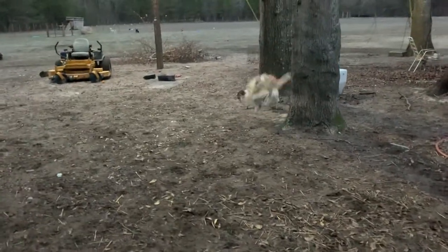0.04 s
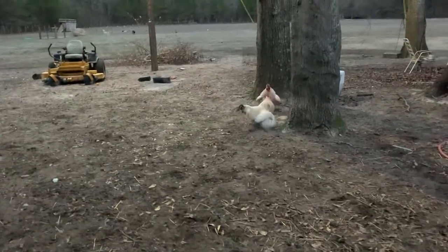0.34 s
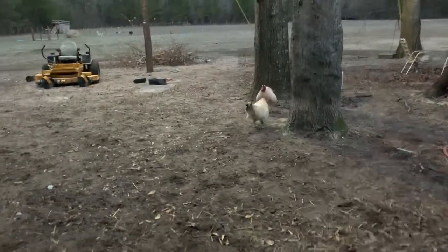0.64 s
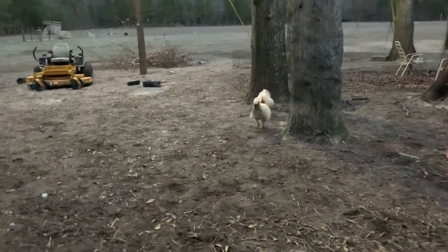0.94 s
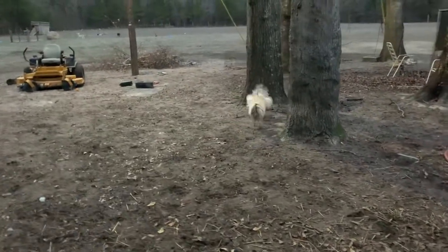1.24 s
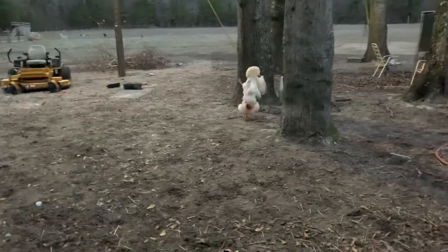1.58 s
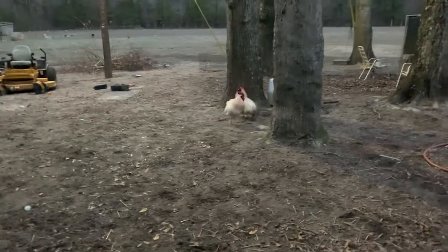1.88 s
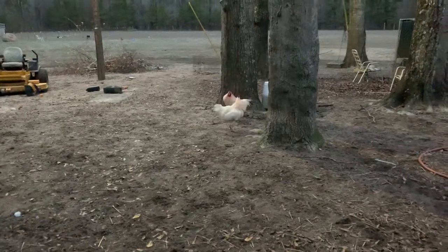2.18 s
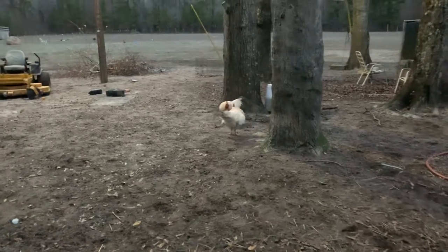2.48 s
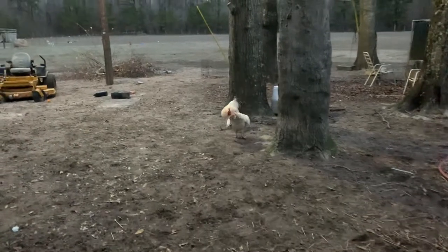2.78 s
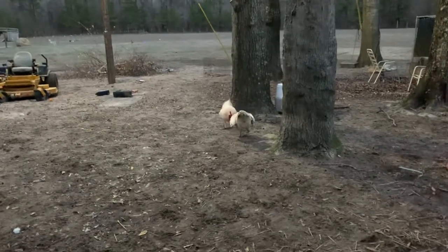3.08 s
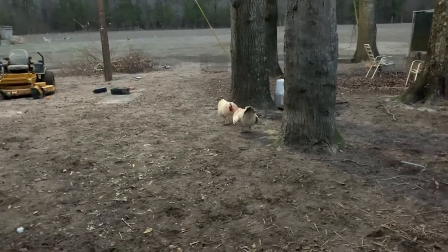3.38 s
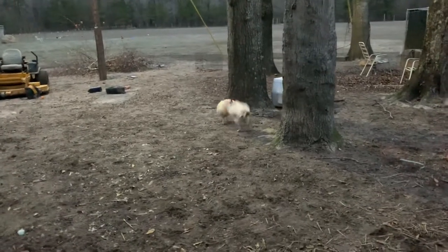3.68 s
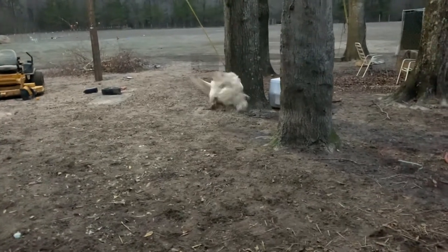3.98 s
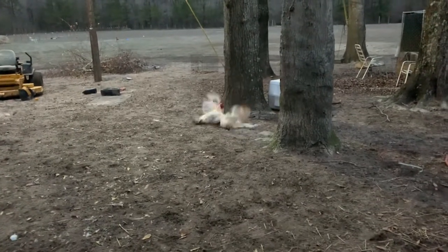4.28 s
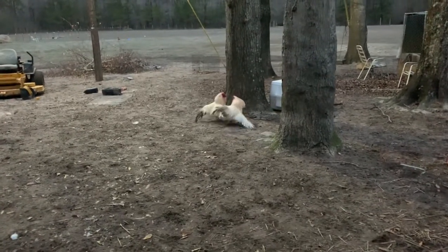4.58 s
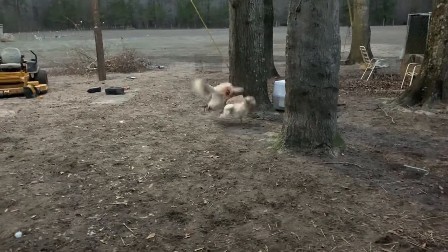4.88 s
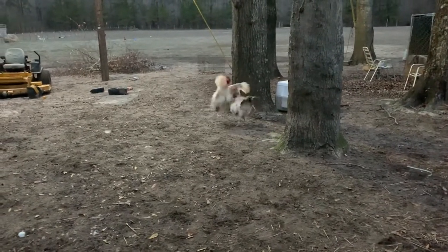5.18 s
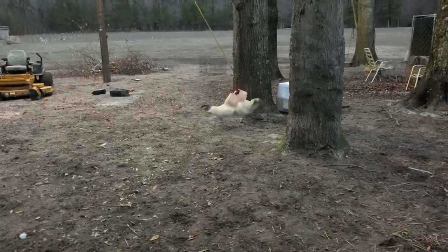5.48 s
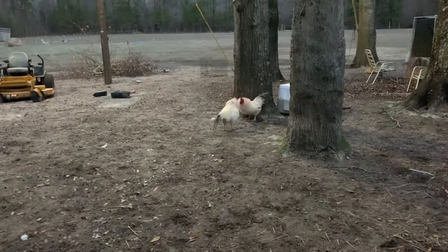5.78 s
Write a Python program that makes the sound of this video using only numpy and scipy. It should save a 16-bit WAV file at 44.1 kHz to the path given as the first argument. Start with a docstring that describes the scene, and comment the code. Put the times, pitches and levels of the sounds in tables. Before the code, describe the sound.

Two roosters fight in dry leaves, their wings slapping and thumping in short bursts over a low outdoor rumble.

```python
"""Two roosters fight in dry leaves by a tree, metres from a small hand-held two-port microphone.
Over a low outdoor rumble they clash at once and again at 1.4 s: each wing beat is a slap of stiff
feathers and a hollow thump of air; feet scuff, litter crackles, trunks and ground scatter the sound.
The grip rubs softly in the lulls. A faint whistle at 3.55 s precedes the main clash at 3.9-4.5 s;
lighter scuffling and a few weaker beats follow."""
import sys
import numpy as np
from scipy import signal
from scipy.fft import rfft, irfft, next_fast_len
from scipy.io import wavfile

SR = 44100
rng = np.random.default_rng(int(sys.argv[2]) if len(sys.argv) > 2 else 0)


def generate_wav(signal):
    """Clip the signal to [-1, 1] and save it as 16-bit WAV at the path in sys.argv[1]."""
    frames = np.transpose(np.atleast_2d(signal))
    scaled = np.clip(frames, -1, 1) * 32767
    pcm = np.round(scaled).astype(np.int16)
    wavfile.write(sys.argv[1], SR, pcm)


N = 261954
TIME_S = np.arange(N) / SR
FFT_SIZE = next_fast_len(N + SR // 3, real=True)
FREQS_HZ = np.maximum(np.arange(FFT_SIZE // 2 + 1) * SR / FFT_SIZE, 1)


def from_db(db):
    """Decibels to gain."""
    return 10 ** (np.asarray(db) / 20)


def unit_rms(x):
    """Scale to unit power."""
    return x / np.sqrt(np.mean(x ** 2) + 1e-20)


def over_hz(points):
    """Interpolate (freq_hz, value) rows along log frequency."""
    hz, value = np.transpose(points)
    return np.interp(np.log(FREQS_HZ), np.log(hz), value)


def through(x, response):
    """Apply a frequency response."""
    return irfft(rfft(x, FFT_SIZE) * response, FFT_SIZE)[..., :N]


def colour(x, points):
    """Minimum-phase filter from (freq_hz, gain_db) rows."""
    cepstrum = irfft(np.log(from_db(over_hz(points))), FFT_SIZE)
    cepstrum[1:FFT_SIZE // 2] *= 2
    cepstrum[FFT_SIZE // 2 + 1:] = 0
    return through(x, np.exp(rfft(cepstrum)))


def band(x, low_hz, high_hz):
    """Gentle band-pass."""
    edges_hz = [low_hz, min(high_hz, SR / 2 - 1000)]
    return signal.sosfilt(signal.butter(2, edges_hz, "band", fs=SR, output="sos"), x)


def drift(knots_per_s):
    """Random wander, unit power."""
    knots = rng.standard_normal(N // 20)
    return unit_rms(np.interp(TIME_S * knots_per_s, np.arange(len(knots)), knots))


def grains(per_s, spread_db, size=N):
    """Random clicks of uneven size, unit power."""
    onsets = np.flatnonzero(rng.random(size) < per_s / SR)
    clicks = np.zeros(size)
    strength, sign = rng.random((2, size))[:, onsets]
    clicks[onsets] = from_db(spread_db * np.minimum(-np.log(strength), 4)) * np.sign(sign - .5)
    return unit_rms(clicks) + 1e-18


def add(out, start_s, sound):
    """Mix a sound in at start_s."""
    start = max(int(start_s * SR), 0)
    out[start:start + len(sound)] += sound[:N - start]


def stroke(centre_hz, half_width_ratio, rise_s, decay_s):
    """Grainy noise band that swells and fades."""
    t = TIME_S[:SR // 2]
    clicks = grains(per_s=2000, spread_db=1.5, size=len(t))
    rub = unit_rms(band(clicks, centre_hz / half_width_ratio, centre_hz * half_width_ratio))
    envelope = (1 - np.exp(-t / rise_s)) * np.exp(-t / decay_s)
    return rub * envelope / envelope.max()


def outdoors(rumble_db=-49.5, hiss_db=-78.5):
    """Low rumble, nearly equal on both sides, and a faint wide hiss."""
    rumble_colour = [(12, -47), (20, -9.5), (49, -2.5), (102, -1), (121, -3), (136, -11.5), (176, -10.5),
                     (213, -18), (290, -23.5), (315, -22.5), (415, -29.5), (546, -36), (1200, -61.5),
                     (1700, -115)]  # freq_hz, gain_db
    side_colour = [(60, -23), (130, -16.5), (250, -12.5), (500, -14.5)]  # left-right difference: freq_hz, gain_db
    hiss_colour = [(200, -5.5), (500, 19.5), (1000, 6), (2000, 7.5), (4000, -3), (8000, -1.5), (15000, -49)]  # freq_hz, gain_db
    mid, side = unit_rms(colour(rng.standard_normal((2, N)), rumble_colour))
    rumble = mid + colour(side, side_colour) * [[1], [-1]]
    hiss = unit_rms(colour(rng.standard_normal((2, N)), hiss_colour))
    return from_db(rumble_db) * rumble + from_db(hiss_db) * hiss


def whistle(start_s=3.55, level_db=-84):
    """Faint thin whistle just before the main clash."""
    out = np.zeros(N)
    tone = stroke(centre_hz=2120, half_width_ratio=1.15, rise_s=0.09, decay_s=0.09)
    add(out, start_s, from_db(level_db) * tone)
    return out


def grip(centre_hz=920, half_width_ratio=1.71, pan_db=3):
    """The hand shifts on the microphone: soft rubs, leaning right."""
    rubs = [(0.476, -66, 0.11), (0.594, -73, 0.032), (1.218, -54.5, 0.04), (1.245, -66, 0.058),
            (2.307, -73, 0.043), (3.183, -67, 0.1), (3.25, -64, 0.042)]  # start_s, level_db, length_s
    out = np.zeros(N)
    for start_s, level_db, length_s in rubs:
        rub = stroke(centre_hz, half_width_ratio, rise_s=0.41 * length_s, decay_s=0.6 * length_s)
        add(out, start_s, from_db(level_db) * rub)
    return out * from_db([[-pan_db], [pan_db]])


def yard(x, near_s=0.0075, far_s=0.084, far_db=-15, shifts_per_s=6, paths=3):
    """Ground and trunks scatter sound to each side; echo paths crossfade as the birds move."""
    scatter_colour = [(100, -22), (300, -17.5), (600, -10), (1100, -6), (2000, -1.5), (4000, -4), (6200, 3),
                      (7400, -11.5), (8300, -0.5), (9800, 2.5), (11400, -43), (12700, 5), (15000, -7)]  # freq_hz, gain_db
    t = TIME_S[:SR // 3]
    decay = np.exp(-t / near_s) + from_db(far_db) * np.exp(-t / far_s)
    echoes = rng.standard_normal((paths, 2, len(t))) * decay
    echoes /= np.sqrt(np.sum(echoes ** 2, axis=-1, keepdims=True))
    fade_rad = np.pi * (shifts_per_s * TIME_S + np.arange(paths)[:, None]) / paths
    shares = np.cos(fade_rad) ** 2
    shares /= np.sqrt(np.sum(shares ** 2, axis=0))
    sent = rfft(colour(x, scatter_colour) * shares, FFT_SIZE)
    returned = np.sum(sent[:, None] * rfft(echoes, FFT_SIZE), axis=0)
    return irfft(returned, FFT_SIZE)[:, :N]


def leaf_litter(patchy_db=1.5, clump_db=3.2, break_db=-7):
    """Each leaf size crackles in clumps in its own band; single leaves break."""
    leaf_colour = [(500, 1.5), (1200, -2), (2300, 2), (4000, 7.5), (6000, -2), (9000, 3.5), (13000, -0.5),
                   (16000, -1.5)]  # freq_hz, gain_db
    edges_hz = np.geomspace(600, 16000, 10)
    rustle = np.zeros(N)
    for low_hz, high_hz in zip(edges_hz, edges_hz[1:]):
        pressure = from_db(patchy_db * drift(knots_per_s=8.4) + clump_db * drift(knots_per_s=110))
        rustle += pressure * band(grains(per_s=1100, spread_db=2.5), low_hz, high_hz)
    breaks = from_db(break_db) * grains(per_s=290, spread_db=4.5)
    return unit_rms(colour(unit_rms(rustle) + breaks, leaf_colour))


def bout_gain(start_s, end_s, peak_db, sag_db_per_s, flare_db_per_s=380, stop_db_per_s=260):
    """Flares up to start_s, sags until end_s, breaks off."""
    early_s, since_s, late_s = np.maximum([start_s - TIME_S, TIME_S - start_s, TIME_S - end_s], 0)
    return from_db(peak_db - flare_db_per_s * early_s - sag_db_per_s * since_s - stop_db_per_s * late_s)


def scuffle(leaf_trim_db=-2, swish_trim_db=-3, flutter_db=1.5):
    """Leaves rustle underfoot and plumage brushes, in uneven bouts."""
    bouts = [(0.01, 0.205, -61.5, -48), (0.236, 0.442, -61.5, -53), (1.404, 1.548, -58.5, -47.5),
             (1.682, 1.952, -67, -51.5), (3.733, 3.8, -71.5, -74), (3.841, 3.87, -60, -59),
             (3.892, 4.085, -52, -36.5), (4.108, 4.252, -59.5, -37.5), (4.291, 4.476, -56.5, -42.5),
             (4.527, 4.677, -64.5, -56), (4.729, 4.9, -69.5, -60.5), (4.922, 5.215, -65, -54),
             (5.242, 5.475, -66.5, -55.5), (5.786, 5.913, -71, -60)]  # start_s, end_s, leaf_db, swish_db
    swish_colour = [(35, 8.5), (90, 13), (160, 10), (280, 3.5), (600, -3), (1000, -14.5), (1600, -14.5),
                    (3000, -23.5)]  # freq_hz, gain_db
    leaf_gain, swish_gain = from_db(-82.5), from_db(-75)  # shuffling between bouts
    for start_s, end_s, leaf_db, swish_db in bouts:
        leaf_gain = np.maximum(leaf_gain, bout_gain(start_s, end_s, leaf_db, sag_db_per_s=39.5))
        swish_gain = np.maximum(swish_gain, bout_gain(start_s, end_s, swish_db, sag_db_per_s=40))
    leaves = from_db(leaf_trim_db) * leaf_litter()
    swish = from_db(swish_trim_db) * unit_rms(colour(rng.standard_normal(N), swish_colour))
    flutter = from_db(flutter_db * drift(knots_per_s=43))
    return flutter * (leaf_gain * leaves + swish_gain * swish)


def foot_scuffs(catch_db=1.5):
    """Feet drag through the litter, catching as they go."""
    drags = [(0.26, -58, 3480, 0.047, 2.8), (0.505, -65.5, 9100, 0.036, 1.8), (0.858, -66, 920, 0.064, 2.4),
             (0.862, -62.5, 6000, 0.062, 2.05), (0.893, -62.5, 700, 0.041, 4.1),
             (1.562, -59, 9000, 0.016, 2.6), (1.822, -58, 11000, 0.012, 1.2),
             (1.853, -62, 8000, 0.015, 2.1), (2.408, -74, 5500, 0.019, 1.8),
             (2.755, -66.5, 1700, 0.065, 4.4), (2.786, -67.5, 3600, 0.077, 4.1),
             (2.856, -68, 1090, 0.038, 2.6), (2.973, -55, 11000, 0.036, 1.9),
             (2.974, -70.5, 2470, 0.064, 1.2), (2.972, -68, 4140, 0.059, 1.07),
             (3.002, -59.5, 7600, 0.032, 4.7), (3.463, -68, 8300, 0.049, 6.2),
             (3.495, -67.5, 7500, 0.032, 1.1), (3.498, -71.5, 3330, 0.047, 1.4),
             (4.29, -39, 4600, 0.044, 6.1), (4.315, -50.5, 1960, 0.013, 1.06),
             (4.425, -53, 3000, 0.012, 3.8), (4.6, -65.5, 3370, 0.046, 2.2),
             (4.732, -73, 12000, 0.022, 1.5), (4.954, -64, 6000, 0.023, 2.1), (5.305, -59, 4800, 0.025, 3),
             (5.346, -54.5, 5470, 0.041, 3.3)]  # start_s, level_db, centre_hz, length_s, half_width_ratio
    drag_colour = [(800, 7.5), (1600, -2.5), (2600, 0), (3500, -0.5), (4400, -0.5), (5400, -7.5),
                   (8300, -5.5), (13000, -10)]  # freq_hz, gain_db
    out = np.zeros(N)
    for start_s, level_db, centre_hz, length_s, half_width_ratio in drags:
        drag = stroke(centre_hz, half_width_ratio, rise_s=0.35 * length_s, decay_s=0.74 * length_s)
        add(out, start_s, from_db(level_db) * drag)
    return colour(out, drag_colour) * from_db(catch_db * drift(knots_per_s=320))


def snaps(ring_db=-2, decay_cycles=3.5, half_width_ratio=1.7):
    """Pecks and snapping twigs: a hard crack that rings a few cycles."""
    contacts = [(0.18, -60, 1060), (0.243, -46.5, 3600), (0.498, -63, 960), (0.787, -66, 2180),
                (1.417, -58, 1900), (1.449, -42, 1900), (1.52, -57, 2540), (1.668, -51, 2500),
                (1.74, -54, 1130), (1.856, -57, 800), (1.884, -63, 4500), (1.892, -57.5, 3900),
                (2.667, -68.5, 1950), (2.974, -56, 8500), (3.872, -35, 995), (4.005, -61, 2040),
                (4.05, -48, 1840), (4.162, -38.5, 1190), (4.263, -45.5, 1870), (4.648, -60, 3480),
                (4.664, -59, 3380), (5.012, -62, 1080), (5.09, -62, 2900), (5.159, -68.5, 8800)]  # start_s, level_db, centre_hz
    out, t = np.zeros(N), TIME_S[:SR // 30]
    for start_s, level_db, centre_hz in contacts:
        fade = np.exp(-t * centre_hz / decay_cycles)
        burst = rng.standard_normal(len(t)) * fade
        crack = unit_rms(band(burst, centre_hz / half_width_ratio, centre_hz * half_width_ratio))
        crack += from_db(ring_db) * unit_rms(np.sin(2 * np.pi * centre_hz * t) * fade)
        add(out, start_s, from_db(level_db) * crack / np.std(crack[:SR // 200]))  # level of first 5 ms
    return out


def wing_thumps(sag_per_cycle=0.089, eddy_db=-17, eddy_low_hz=250, eddy_high_hz=750):
    """A wing shoves air or hits a body: a few hollow cycles that slow and shed eddies."""
    shoves = [(0.069, -34, 180.5, 2.8), (0.068, -46, 485, 1.3), (0.084, -34, 98, 0.33),
              (0.104, -36.5, 230, 1.23), (0.247, -35.5, 188, 0.65), (0.345, -36, 164, 0.54),
              (1.433, -39, 215, 1.14), (1.449, -26.5, 641, 1.28), (1.474, -41, 640, 1.6),
              (1.67, -48.5, 602, 1.8), (1.835, -43.5, 203, 1.6), (3.874, -31.5, 103, 0.52),
              (3.883, -32.5, 580, 1.6), (3.919, -23.5, 243, 1.2), (3.981, -27, 234, 1.1),
              (3.983, -28, 507, 1.2), (4.002, -33, 187, 1.7), (4.052, -33, 377, 1.1), (4.117, -38, 89, 1.4),
              (4.121, -38, 283, 0.46), (4.135, -29.5, 537, 1.45), (4.16, -35.5, 140, 1.7),
              (4.213, -35, 252, 0.93), (4.225, -30, 484, 0.82), (4.264, -30, 496, 0.65),
              (4.309, -35.5, 470, 0.87), (4.343, -29.5, 105, 1.03), (4.347, -26, 202, 0.53),
              (4.351, -26.5, 480, 0.83), (5.773, -30.5, 166, 0.51)]  # start_s, level_db, pitch_hz, swell_cycles
    out = np.zeros(N)
    for start_s, level_db, pitch_hz, swell_cycles in shoves:
        cycles = TIME_S[:SR // 6] * pitch_hz
        envelope = (cycles / swell_cycles * np.exp(1 - cycles / swell_cycles)) ** 2
        wave = np.sin(2 * np.pi * np.log1p(sag_per_cycle * cycles) / sag_per_cycle)
        eddies = unit_rms(band(rng.standard_normal(len(cycles)), eddy_low_hz, eddy_high_hz))
        eddies *= min(pitch_hz / eddy_low_hz, 1) ** 2  # slow strokes shed less
        add(out, start_s, from_db(level_db) * envelope * (wave + from_db(eddy_db) * eddies))
    return out


def feather_strike(t, treble_db, decay_s, rise_s=0.00012, split_hz=3500, lift_db=3):
    """The wing sweeps in, quills crack down at t = 0, vanes catch and rub on."""
    before_s, after_s = np.minimum(t, 0), np.maximum(t, 0)
    sweep = from_db(-24) * np.exp(before_s / 0.0072)
    tail = from_db(-26) * np.exp(-after_s / 0.034)
    catches = grains(per_s=7000, spread_db=2.5, size=len(t))
    dull = signal.sosfilt(signal.butter(1, split_hz, fs=SR, output="sos"), catches)
    burst = unit_rms(dull + from_db(treble_db + lift_db) * (catches - dull))
    contact = (1 - np.exp(-after_s / rise_s)) * np.exp(-after_s / decay_s)
    contact /= contact.max() * np.sqrt(np.average(burst ** 2, weights=contact ** 2))
    strike = burst * (contact + np.where(t < 0, sweep, tail))
    crack = np.sqrt(0.00016 * SR)  # energy of 0.16 ms at unit power
    strike[np.searchsorted(t, 0)] += crack * min(from_db(treble_db), 1)
    return strike


def wing_slaps(trim_db=-5, lead_s=0.05, body_hz=200, thinning_exponent=0.18):
    """Stiff feathers slap; a light touch uses only the tips and has little body."""
    beats = [(0.0675, -19, 12, 0.0006), (0.074, -37, 3, 0.005), (0.103, -54, -14, 0.0018),
             (0.243, -33, -11, .0006), (0.269, -42.5, -17, 0.0023), (0.345, -44, 6, 0.0022),
             (1.433, -35, 2, 0.0067), (1.448, -20.5, -2, 0.0014), (1.453, -33, -5, 0.0032),
             (1.6685, -27.5, 6, 0.0007), (1.674, -36, 1, 0.006), (3.870, -13, 7, 0.002),
             (3.877, -24, -1, 0.004), (3.883, -23, -2, 0.0028), (3.919, -37, -25, 0.0034),
             (3.978, -33, -7, 0.008), (3.99, -25, 12, 0.0017), (4.001, -26, -7, 0.003),
             (4.048, -35, -31, 0.0032), (4.133, -23.5, 0, 0.0016), (4.145, -24, -4, 0.0019),
             (4.159, -21.5, 0, 0.002), (4.198, -33, -14, 0.0017), (4.206, -31, -7, 0.003),
             (4.338, -26, -6, 0.0018), (4.343, -23, -4, 0.003), (4.971, -39, 1, .003),
             (5.259, -33.5, 3, 0.0018), (5.405, -39, 0, 0.0043), (5.767, -43.5, -4.5, 0.003)]  # contact_s, level_db, treble_db, decay_s
    slap_colour = [(150, -5), (450, 13), (700, 1.5), (1100, 2), (1500, -1.5), (2100, -1.5), (3500, -3),
                   (6000, -8), (10000, -8), (14000, -9), (16000, -32)]  # freq_hz, gain_db
    out, t = np.zeros(N), TIME_S[:SR // 3] - lead_s
    hardest_db = max(beat[1] for beat in beats)
    for contact_s, level_db, treble_db, decay_s in beats:
        strike = feather_strike(t, treble_db, decay_s)
        low_cut_hz = body_hz / from_db(level_db - hardest_db) ** thinning_exponent
        slap = signal.sosfilt(signal.butter(1, low_cut_hz, "high", fs=SR, output="sos"), strike)
        add(out, contact_s - lead_s, from_db(level_db + trim_db) * slap)
    return colour(out, slap_colour)


def scene(yard_db=0.5):
    """The fight reaches both ports directly and via the yard; the microphone body delays the right."""
    right_phase = [(20, 0), (1250, 0), (1800, 1.2), (2700, 0), (4400, -.5), (6300, -1.4), (7350, -3.2),
                   (8200, -6.3), (9700, -6), (11350, -3.1), (13300, 0), (14200, .2), (15500, 3)]  # freq_hz, phase_rad
    fight = wing_slaps() + wing_thumps() + snaps() + foot_scuffs() + scuffle() + whistle()
    direct = np.array([fight, through(fight, np.exp(1j * over_hz(right_phase)))])
    return direct + from_db(yard_db) * yard(fight) + grip() + outdoors()


def record(dry):
    """Each port has its own colour, the right a treble resonance; steep low-pass on both."""
    left_colour = [(100, -1), (300, 0), (800, 0), (1100, 1.5), (2200, 2), (2800, -1), (4800, -0.5),
                   (10000, 0), (11500, 2.5), (14000, 0), (15200, 4)]  # freq_hz, gain_db
    right_colour = [(100, 1), (300, 0), (1150, 0), (1500, -3), (2800, -1), (5000, -1), (7700, 1.5),
                    (8150, 9), (8800, 4), (9600, 0), (11500, 2), (14000, 0), (15200, 4)]  # freq_hz, gain_db
    cutoff_hz = 15850
    ports = np.array([colour(dry[0], left_colour), colour(dry[1], right_colour)])
    return signal.sosfilt(signal.ellip(10, .2, 70, cutoff_hz, fs=SR, output="sos"), ports)


dry = scene()
out = record(dry)
generate_wav(out)
```